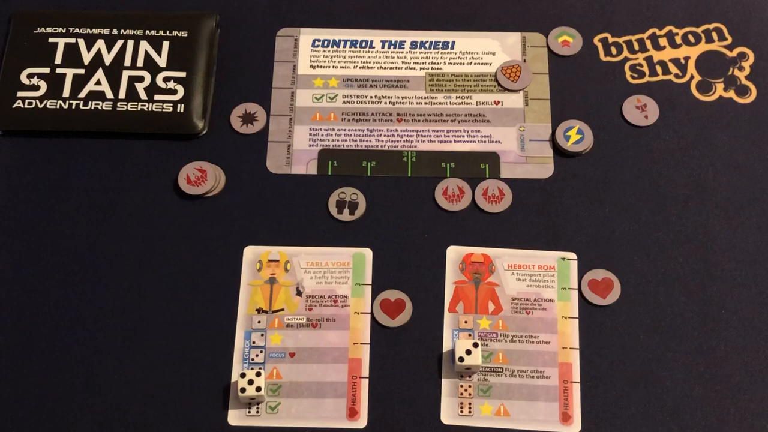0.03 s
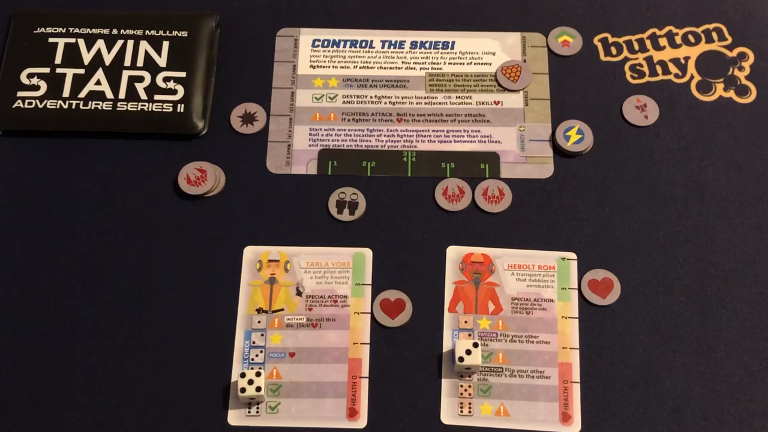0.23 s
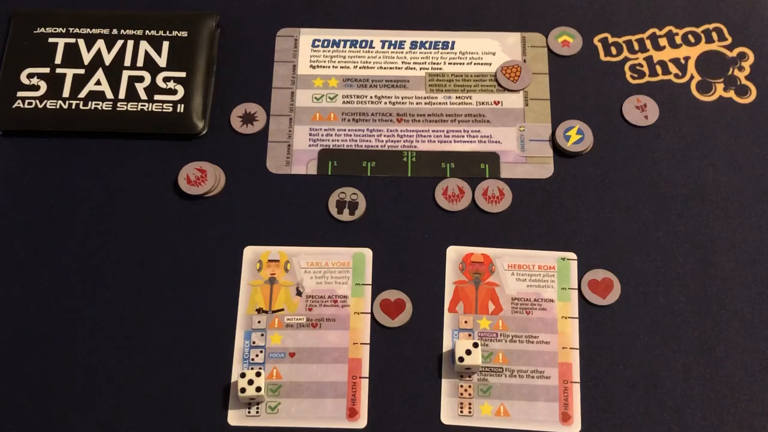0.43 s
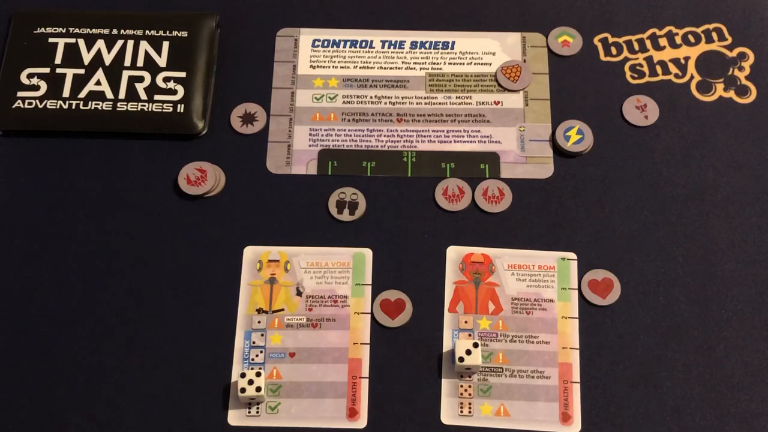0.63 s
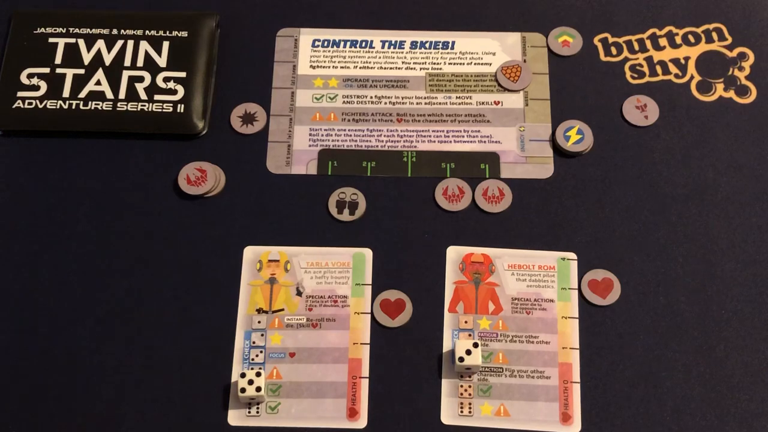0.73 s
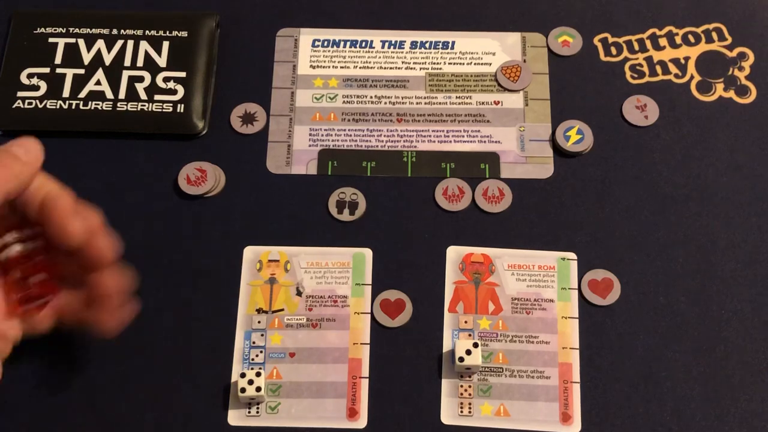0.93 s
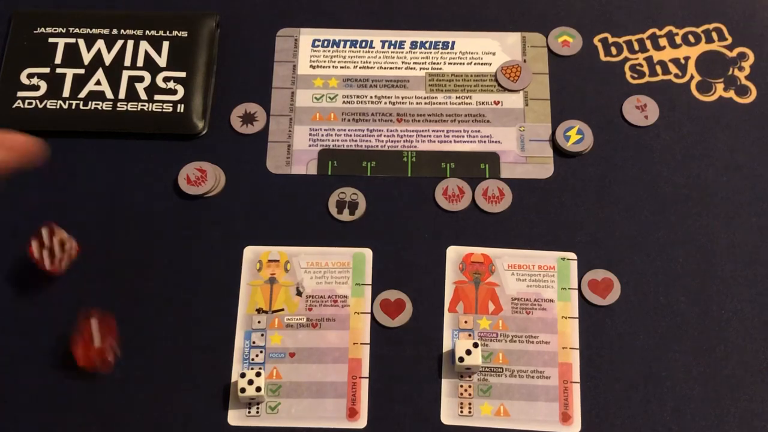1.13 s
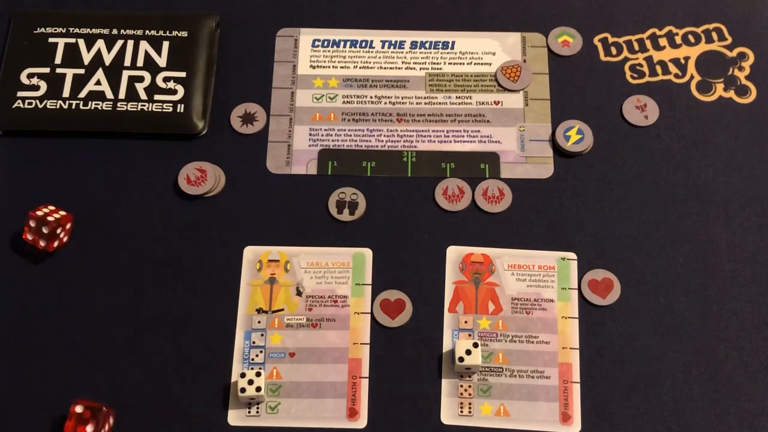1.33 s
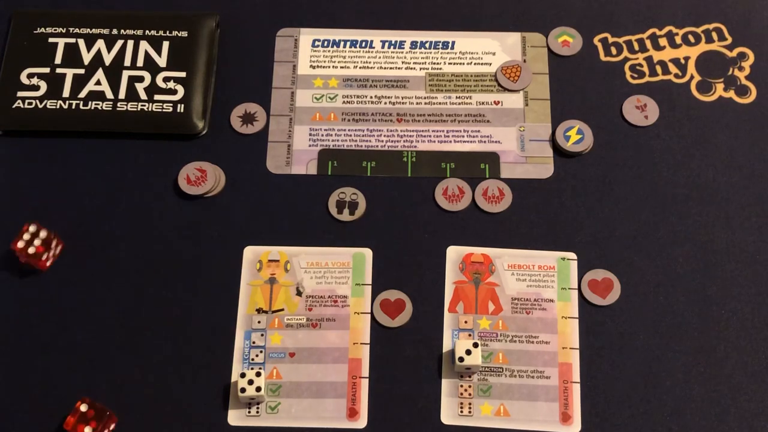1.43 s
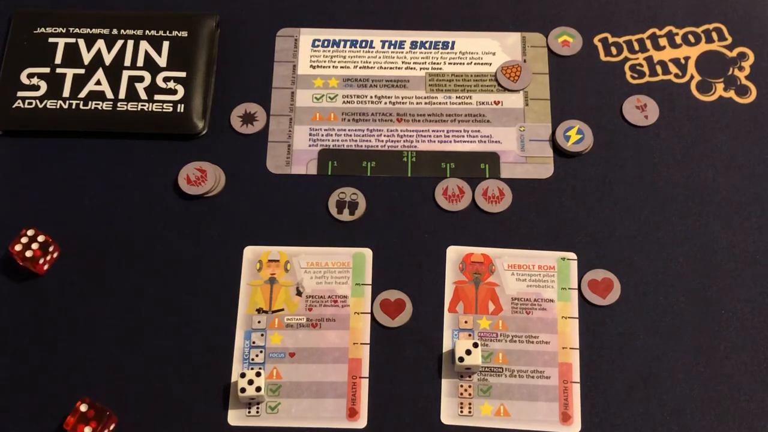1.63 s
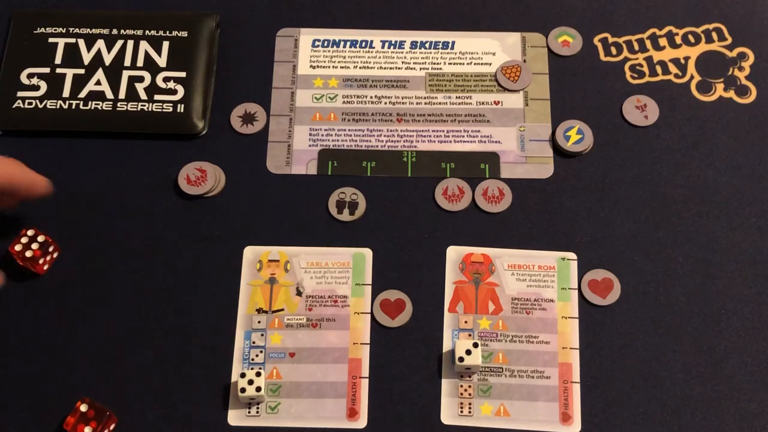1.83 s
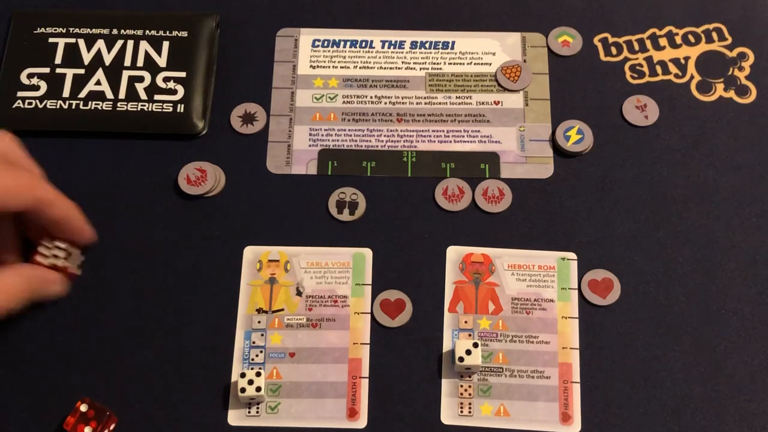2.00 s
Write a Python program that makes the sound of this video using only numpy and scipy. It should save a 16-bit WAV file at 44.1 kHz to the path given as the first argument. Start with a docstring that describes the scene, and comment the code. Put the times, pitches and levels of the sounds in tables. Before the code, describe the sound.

Dice clacking in a hand, then rolled onto a mat with soft, dull knocks.

```python
"""Dice shaken and rolled

Two plastic dice rattle in a cupped hand close to the microphone, then roll onto a cloth mat on a table.
Each clack rings for a millisecond or two in the hollow of the hand; skin rustles and the hand pushes air.
The dice land with thuds that ring the table and tumble; one tips over late, and fingers reach back in.
A small room answers over quiet room tone."""
import sys
import numpy as np
from scipy import signal
from scipy.fft import rfft, irfft
from scipy.io import wavfile
from scipy.ndimage import uniform_filter1d

SR = 44100
rng = np.random.default_rng(int(sys.argv[2]) if len(sys.argv) > 2 else 0)


def transcribe(signal):
    """Save signal, clipped to [-1, 1], as a 16-bit WAV file at the path in sys.argv[1]."""
    frames = np.atleast_2d(signal).T
    limited = np.clip(frames, -1, 1)
    pcm = np.round(limited * 32767).astype(np.int16)
    wavfile.write(sys.argv[1], SR, pcm)


N = 90978
TIME = np.arange(N) / SR


def amp(db):
    """Decibels to gain."""
    return 10 ** (np.asarray(db) / 20)


def unit_rms(x):
    """Scales to rms 1."""
    return x / np.sqrt(np.mean(x ** 2) + 1e-20)


def curve_at(points, hz):
    """Reads a curve on a log-frequency axis."""
    f, value = np.transpose(points)
    return np.interp(np.log(hz + 1), np.log(f + 1), value)


def add(mix, start, sound):
    """Mixes a sound in at a time in seconds."""
    part = mix[max(round(start * SR), 0):][:len(sound)]
    part += sound[:len(part)]


def bins(size=4096):
    """Frequencies of a spectrum."""
    return np.fft.rfftfreq(size, 1 / SR)


def resonance(hz, width):
    """Gain of a steep-sided resonance, 1 at its centre."""
    f = bins() + 1
    return 1 / (1 + ((f * f - hz * hz) / (2 * f * width)) ** 2) ** 2


def softened(hz, order):
    """Treble loss of a contact that takes a finite time."""
    return 1 / np.sqrt(1 + (bins() / hz) ** (2 * order))


def impact(gain):
    """The sharpest causal pulse that has this spectrum."""
    log_gain = np.log(np.maximum(np.r_[gain, gain[-2:0:-1]], 1e-5))
    minimum_phase = np.exp(np.conj(signal.hilbert(log_gain)))
    return np.fft.ifft(minimum_phase).real[:len(gain)]


def noise(eq):
    """Coloured noise of rms 1."""
    white = rfft(rng.standard_normal(N))
    return unit_rms(irfft(white * amp(curve_at(eq, bins(size=N))), N))


def fader(points):
    """Gain over time from (time, level) points."""
    return amp(np.interp(TIME, *np.transpose(points)))


# colour of the room tone (frequency [Hz], relative level [dB])
ROOM_TONE_EQ = [(20, -4), (60, -5.5), (130, -7.5), (270, -15), (450, -23.5), (800, -23), (1400, -30),
                (4000, -33.5), (10000, -38.5), (16000, -39.5)]


def room_tone():
    """A quiet, steady, dark bed of noise."""
    return amp(-66) * noise(ROOM_TONE_EQ)


# swell of the draught (time [s], level [dB])
DRAUGHT_FADER = [(0, -52.5), (.25, -40.5), (.45, -46.5), (.7, -48.5), (.95, -55.5), (1.15, -65),
                 (1.5, -55.5), (2.06, -60.5)]
# its sub-bass colour (frequency [Hz], relative level [dB])
DRAUGHT_EQ = [(5, -7.5), (12, 8.5), (25, -14), (50, -17), (100, -35.5), (300, -56), (1000, -100)]
# puffs of air (centre time [s], width [s], level [dB])
AIR_PUFFS = [(0.1058, 0.005, -34.5), (0.267, 0.018, -29.5)]


def hand_air():
    """The moving hand stirs a low draught; two quick swings suck and push at the microphone."""
    out = noise(DRAUGHT_EQ) * fader(DRAUGHT_FADER)
    for centre, width, db in AIR_PUFFS:
        swing = (TIME - centre) / width
        out += amp(db) * swing * np.exp(-swing ** 2 / 2)
    return out


# swells of rubbing skin (time [s], level [dB])
RUSTLE_FADER = [(0, -70.5), (.09, -72.5), (.15, -59.5), (.21, -63.5), (.28, -56.5), (.4, -64.5), (.48, -71),
                (.6, -68.5), (.8, -78.5), (1.05, -69), (1.3, -95)]
# colour of the rustle (frequency [Hz], relative level [dB])
RUSTLE_EQ = [(40, 0), (150, 5), (300, 1.5), (800, 0), (1600, -9), (3000, -15.5), (7000, -21.5),
             (11000, -22.5), (16000, -36)]
# fingers brushing the mat at the end (time [s], level [dB])
REACH_FADER = [(1.85, -85), (1.95, -73.5), (2.06, -73)]
# colour of the brushing (frequency [Hz], relative level [dB])
REACH_EQ = [(100, -5), (700, 1), (1500, -6), (4000, -11), (8000, -12), (16000, -19.5)]


def skin_rustle(grain_db=2):
    """Fingers rub with a grainy hiss during the shake, then brush the mat as they reach for a die."""
    roughness = unit_rms(uniform_filter1d(rng.standard_normal(N), size=50))
    grain = amp(grain_db * roughness)
    shake = unit_rms(noise(RUSTLE_EQ) * grain) * fader(RUSTLE_FADER)
    reach = unit_rms(noise(REACH_EQ) * grain) * fader(REACH_FADER)
    return shake + reach


# resonances of the dice and the hollow of the hand (frequency [Hz], width [Hz])
HAND_MODES = [(2250, 1300), (4050, 720), (5200, 1650), (6400, 1160), (8000, 1220), (10600, 4600)]
# die hitting die (time [s], then the level [dB] of each of the six resonances, low to high)
CLACK_HITS = [(0.0024, -27, -21, -28, -27, -59, -53), (0.0101, -21, -24.5, -20, -16, -37, -60),
              (0.0121, -21, -16.5, -16.5, -25, -23, -35), (0.0203, -20.5, -22, -23, -14, -25, -54),
              (0.0253, -22.5, -30, -18, -11.5, -17, -47), (0.2087, -11, -15.5, -2, -10.5, -16.5, -29),
              (0.2529, -5, -4, -15, -4, -19, -33), (0.2587, -14.5, -12, -9, -18, -16, -40),
              (0.2629, -5, -5, -8.5, -2.5, -16, -25), (0.29, -8, -0.5, -13, 2, -4, -17.5),
              (0.3014, -15, -12, -16, -14, -42, -37), (0.3157, -21, -13, -37, -6, -11.5, -29),
              (0.3189, -29, -10.5, -28, -6.5, -13, -28), (0.3206, -21, -28, -31, -15, -15, -23),
              (0.3257, -18.5, -26, -19, -14.5, -29.5, -31), (0.3853, -21, -21, -34, -20.5, -39, -41),
              (0.3926, -16, -15, -28, -21, -42, -51), (0.3997, -19, -20, -28, -33, -53, -49),
              (0.4075, -18, -17, -33, -25, -59, -50.5), (0.4139, -22, -17, -47, -47, -52, -55),
              (0.4275, -20, -16, -33, -21, -36, -56), (0.4626, -34, -26, -21.5, -16.5, -32, -68),
              (0.4828, -45, -33.5, -23.5, -43, -31, -48), (0.5247, -3, 4.5, -18, 1.5, -8, -55),
              (0.5894, -2, 1, -7.5, -15, -22, -32), (0.597, -3, -3, -21, -10.5, -22, -33),
              (0.621, -33, -15, -38, -19, -29, -58), (0.6302, -16, -17, -31, -18, -33, -50),
              (0.6482, -8, -2.5, -22, -11.5, -21, -33), (0.6566, -14, -11, -25, -22, -38, -43),
              (0.6872, -5, -3.5, -15, -16.5, -43, -53), (0.6969, -4.5, -2, -13, -27, -47, -57),
              (0.7041, -9.5, -3.5, -11.5, -23, -39, -43), (0.7158, -11, -12, -16, -19, -36, -44),
              (0.7245, -12, -20, -19, -38, -31, -62), (0.7309, -13.5, -22, -20, -40, -26, -37),
              (0.7411, -6, -30, -10.5, -9.5, -11.5, -37), (0.768, -12, -31, -6.5, -2.5, -4, -21),
              (0.8248, -16, -21, -20, -19.5, -44, -40), (0.8377, -23.5, -33, -22.5, -28, -42, -41),
              (1.015, -30.5, -42, -43, -13, -26, -28.5), (1.0376, -32, -40, -27, -18.5, -26, -32.5),
              (1.0473, -40, -47, -28, -23, -25, -40), (1.1148, -11, -20.5, -18, -10, -24, -37),
              (1.139, -20, -30, -21, -31, -30, -57)]


def clacks(grip_spread=0.017, low_cut_hz=910, scatter_decay_s=0.0011):
    """Each collision rings damped resonances, which shift with the grip, and scatters in the hand."""
    out, t = np.zeros(N), np.arange(256) / SR
    grips = 1 + grip_spread * rng.standard_normal((len(CLACK_HITS), len(HAND_MODES)))
    scatters = rng.standard_normal((len(CLACK_HITS), len(t))) * np.exp(-t / scatter_decay_s)
    contact_eq = softened(hz=12000, order=4) / np.sqrt(1 + (low_cut_hz / (bins() + 1)) ** 2)
    for (start, *levels), grip, scatter in zip(CLACK_HITS, grips, scatters):
        ring_power = sum((amp(db) * resonance(hz * detune, width)) ** 2
                         for db, detune, (hz, width) in zip(levels, grip, HAND_MODES))
        palm = amp(levels[0] - 20) * resonance(hz=975, width=820)
        tick = amp(max(levels) - 47)
        clack = impact(np.sqrt(ring_power + palm ** 2 + tick ** 2) * contact_eq)
        scattered = np.convolve(clack, scatter / np.linalg.norm(scatter))
        add(out, start, clack)
        add(out, start + 0.00045, amp(-8.5) * scattered)  # between the fingers
        add(out, start + 0.0079, amp(-20.5) * clack)  # reflection off the table
    return out


# decay of the room (frequency [Hz], T60 [s])
REVERB_DECAY = [(200, 0.48), (700, 0.67), (2200, .5), (6000, 0.54), (9000, .38), (14000, 0.33)]
# colour of the reverb (frequency [Hz], wet level [dB])
REVERB_EQ = [(150, 2), (280, -10), (450, -3.5), (900, -1), (1500, -12.5), (2300, -10.5), (3900, -15.5),
             (5400, -6), (6800, -13.5), (8200, -14), (9600, -10), (11500, -6.5), (15000, -2)]


def room_tail(predelay_s=0.00085, build_s=0.0015):
    """A diffuse tail that builds quickly and dies at its own speed in each band."""
    hz, t, bands = signal.stft(rng.standard_normal(SR), SR, nperseg=256)
    rate = np.log(1000) / curve_at(REVERB_DECAY, hz)[:, None]
    decay = np.exp(-rate * t) * np.sqrt(2 * rate / SR)
    wet = amp(curve_at(REVERB_EQ, hz))[:, None]
    tail = signal.istft(bands * decay * wet, SR, nperseg=256)[1]
    return tail * np.clip((np.arange(len(tail)) / SR - predelay_s) / build_s, 0, 1)


def room_reverb(send, count=3, sweep_hz=9):
    """The dice move, so successive hits set off different tails: the send sweeps between them."""
    sweep = 2 * np.pi * sweep_hz * TIME
    feeds = [send * np.cos(sweep + np.pi * k / count) for k in range(count)]
    return np.sqrt(2 / count) * sum(signal.fftconvolve(feed, room_tail())[:N] for feed in feeds)


# die scraping die, plus one lone small tick at 0.143 s (start [s], length [s], level [dB], centre frequency
# [Hz])
SLIDE_CUES = [(.0612, 0.0049, -63, 4970), (.075, .005, -50, 5580), (.143, 0.00024, -42.5, 2450),
              (.151, .004, -52.5, 5560), (0.164, 0.0079, -55.5, 3800), (0.34, 0.0046, -54, 5200),
              (0.4248, .006, -50, 4050), (0.437, 0.0048, -54, 3830)]


def slides(slips_per_s=1900, high_cut_hz=8500):
    """A sliding edge chatters in a quick run of tiny slips."""
    out = np.zeros(N)
    for start, length, db, hz in SLIDE_CUES:
        count = max(round(length * slips_per_s), 1)
        slips = np.zeros(round(length * SR) + 1)
        slips[rng.integers(0, len(slips), count)] = rng.uniform(0.13, 1, count)
        click = impact(resonance(hz, width=hz) / (1 + (bins() / high_cut_hz) ** 8))
        chatter = np.convolve(slips, click)
        add(out, start, amp(db) * chatter * np.sqrt(len(slips) / np.sum(chatter ** 2)))
    return out


# die hitting the mat (time [s], thud level [dB], knock level [dB], knock pitch [Hz])
MAT_HITS = [(1.1141, 0, -13.5, 2180), (1.1255, -8.5, -9, 2310), (1.1544, -9.5, -12.5, 2240),
            (1.2009, -8.5, -18.5, 2370), (1.2062, -17, -15, 2140), (1.232, -6, -12.5, 2000),
            (1.2403, -15, -22.5, 2300), (1.2608, -27, -21.5, 1710), (1.296, -25, -46, 2000),
            (1.4946, -10, -13, 1315)]
# resonances of a knock (frequency [x knock pitch], width [x own frequency], relative level [dB])
KNOCK_MODES = [(.62, 0.21, -6.5), (1, 0.22, -1), (1.25, 1, -14.5)]


def landings(wall_echo_s=0.0355, wall_echo_db=-3.5):
    """The mat softens each blow to a dull knock and a thud; a wall throws the thud back."""
    out = np.zeros(N)
    punch = amp(0.5) * impact(resonance(hz=319.4, width=193))
    body = amp(-8) * impact(resonance(hz=255, width=425))
    thud = -(punch + body)
    for start, thud_db, knock_db, hz in MAT_HITS:
        ring = sum(amp(db) * resonance(ratio * hz, width * ratio * hz)
                   for ratio, width, db in KNOCK_MODES)
        knock = impact(ring * softened(hz=3330, order=6))
        add(out, start, amp(thud_db) * thud + amp(knock_db) * knock)
        add(out, start + wall_echo_s, amp(thud_db + wall_echo_db) * thud)
    return out


# ring of the table under the mat (frequency [Hz], offset from thud level [dB], T60 [s])
TABLE_MODES = [(126.5, -51.5, 0.24), (201.8, -48, 0.46), (234.2, -54.5, 0.6), (265, -47, 0.33),
               (295.5, -51.5, 0.37), (345, -44.5, 0.22), (395, -55, .3), (434, -65, 0.24), (472, -77, .28),
               (558.2, -59, 0.49), (570, -70, 0.32), (800, -58, .3), (910, -63, .25)]


def table_ring(spot_spread_db=1.5):
    """Each landing rings the table's modes, a little differently at each spot."""
    out, t = np.zeros(N), np.arange(SR) / SR
    spots = spot_spread_db * rng.standard_normal((len(MAT_HITS), len(TABLE_MODES)))
    for (start, thud_db, _, _), spot in zip(MAT_HITS, spots):
        for (hz, db, t60), spot_db in zip(TABLE_MODES, spot):
            ring = np.exp(-np.log(1000) * t / t60) * np.sin(2 * np.pi * hz * t)
            add(out, start, -amp(thud_db + db + spot_db) * ring)
    return out


def scene(roll_send_db=5):
    """Dice, hand and table in mono; the landings are farther off and so more reverberant."""
    rattle = clacks() + slides()
    roll = landings()
    reverb = room_reverb(rattle + amp(roll_send_db) * roll)
    return (rattle + roll + reverb + table_ring() + skin_rustle() + hand_air() + room_tone())[None]


def record(dry, high_cut_hz=16100):
    """A steep high cut takes the very top off the mix."""
    lowpass = signal.firwin(255, high_cut_hz, window=("kaiser", 8), fs=SR)
    return signal.oaconvolve(dry, lowpass[None], "same")


dry = scene()
out = record(dry)
transcribe(out)
```